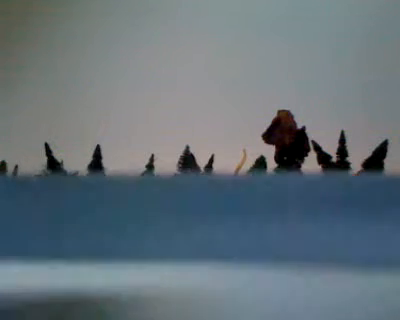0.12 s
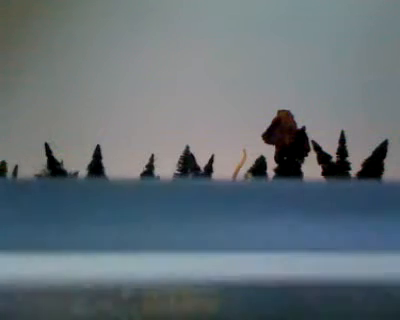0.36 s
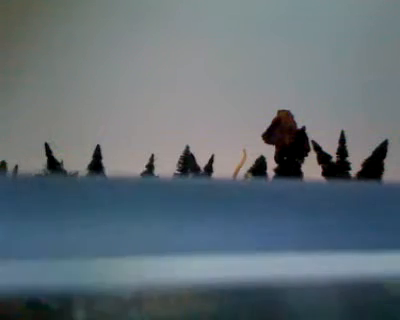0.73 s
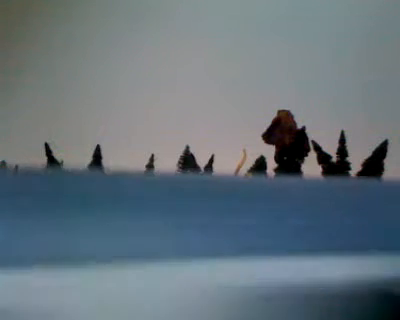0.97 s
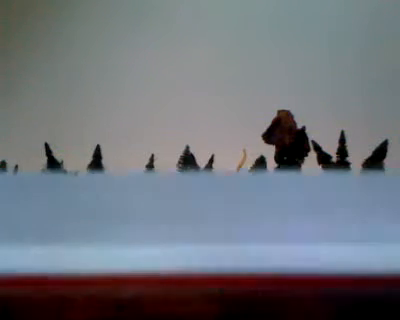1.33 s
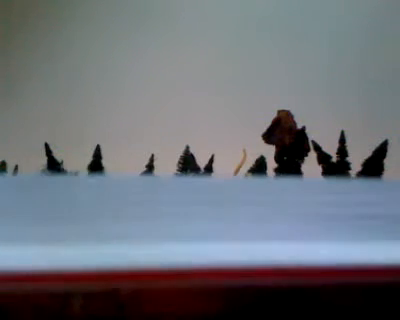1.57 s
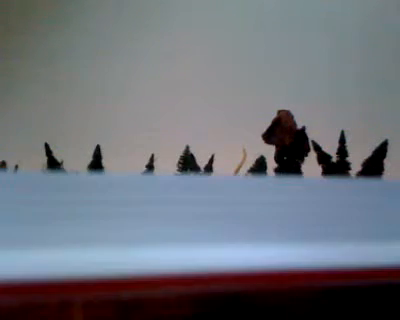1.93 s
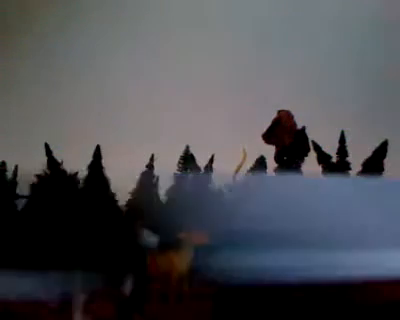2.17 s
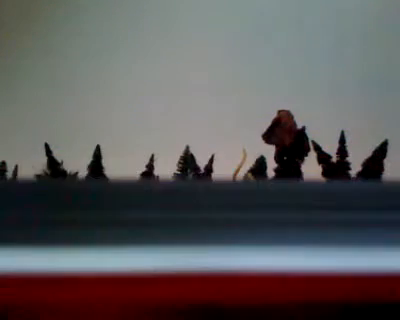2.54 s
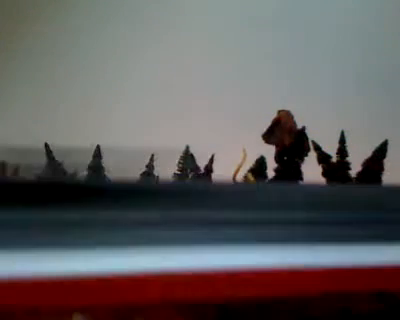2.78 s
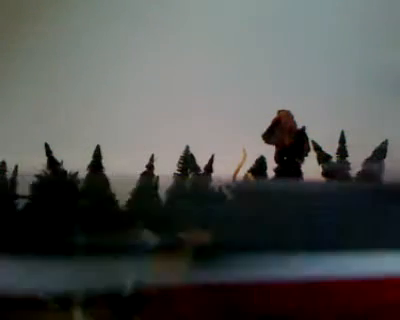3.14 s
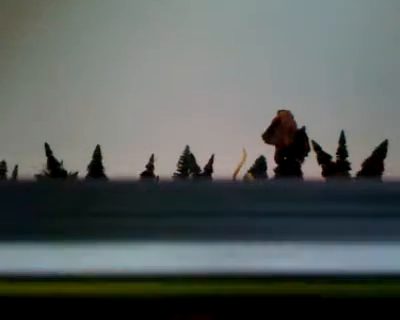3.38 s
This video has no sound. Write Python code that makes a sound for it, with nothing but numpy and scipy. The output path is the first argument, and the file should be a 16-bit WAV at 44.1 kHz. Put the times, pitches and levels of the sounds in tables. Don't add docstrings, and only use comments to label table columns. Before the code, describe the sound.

A model train rolls past on a table in a room, close to a camera microphone; steady wheel hiss with constant irregular clicks and plastic knocks, sharper double ticks at nearby rail gaps, low rumble underneath.

```python
import sys
import numpy as np
from scipy import signal
from scipy.fft import rfft, irfft
from scipy.io import wavfile
from scipy.ndimage import uniform_filter1d

SR = 44100
rng = np.random.default_rng(int(sys.argv[2]) if len(sys.argv) > 2 else 0)


def gain_from_decibels(decibels):
    exponent = np.asarray(decibels, float) / 20
    return 10 ** exponent


def int16_out(signal):
    q = np.round(np.clip(np.atleast_2d(signal).T, -1, 1) * 32767)
    wavfile.write(sys.argv[1], SR, q.astype(np.int16))


N = 158760

# frequency in Hz, level in dB.
FAR_COLOUR = [(2000, -9), (4500, 2.5), (7000, 3), (10000, -4), (13000, -11), (16000, -18)]


def evened(x):
    return x / np.sqrt(np.mean(x ** 2) + 1e-20)


def read(points, hz):
    f, value = np.transpose(points)
    return np.interp(np.log(hz + 1), np.log(f + 1), value)


def coloured(points, size):
    gain = gain_from_decibels(read(points, np.fft.rfftfreq(size, 1 / SR)))
    return evened(irfft(rfft(rng.standard_normal(size)) * gain, size))


def tone(hz, size):
    return np.sin(2 * np.pi * hz * np.arange(size) / SR)


def resonate(x, hz, width):
    turn = np.exp(2j * np.pi * hz * np.arange(len(x)) / SR)
    r = np.exp(-np.pi * abs(width) / SR)
    return 2 * (turn * signal.lfilter([1 - r], [1, -r], x / turn)).real


def burst(x, length):
    u = np.arange(len(x)) / SR / abs(length)
    y = x * u ** .7 * np.exp(-2 * u ** 1.5)
    return y / abs(y).max()


def struck(x, rise, t60):
    t = np.arange(len(x)) / SR
    y = x * (1 - np.exp(-(t / rise) ** 2)) * gain_from_decibels(-60 * t / t60)
    return y / abs(y).max()


def add(mix, s, sound):
    part = mix[round(s * SR):][:len(sound)]
    part += sound[:len(part)]


def rolling():
    # time in seconds, hiss level in dB.
    roll = [(0.0, -40.5), (0.14, -39.5), (0.76, -38.5), (1.26, -39.5), (2.07, -39.5), (3.49, -39),
            (3.6, -38.5)]
    # frequency in Hz, level in dB per Hz.
    roll_colour = [(200, -9), (440, -8.5), (800, 1), (2400, 0.5), (3400, -2.5), (4400, -7), (8000, -17.5),
                   (15800, -33)]
    # time in seconds, resonance in Hz, lift in dB.
    cars = [(.08, 2700, 1), (.3, 3400, 4), (.48, 3600, 3), (.56, 2900, 6), (.7, 3300, 7.5), (.84, 3350, 7),
            (.92, 2700, 6), (1.28, 2450, 1), (1.42, 3200, 5), (1.56, 3480, 6.5), (1.82, 3100, 7),
            (2.1, 2600, 6), (2.4, 2000, 3), (2.54, 3400, 5), (2.85, 3550, 5.5), (3.05, 3200, 5),
            (3.3, 2200, 3), (3.46, 3420, 5)]
    frames = N // 64 + 5
    hz = np.fft.rfftfreq(256, 1 / SR)[:, None]
    t = np.arange(frames) * 64 / SR
    real, imaginary, patches = rng.standard_normal((frames, 129, 3)).T
    patches = uniform_filter1d(patches, size=4, axis=0)
    patches = evened(uniform_filter1d(patches, size=40, axis=1))
    flicker = evened(uniform_filter1d(rng.standard_normal(frames), size=4))

    at, car_hz, lift_db = np.transpose(cars)
    centre = np.interp(t, at, car_hz)
    octaves = np.where(hz > centre, .11, .34)
    ridge = np.exp(-.5 * (np.log2((hz + 1) / centre) / octaves) ** 2)
    body_db = np.interp(t, at, lift_db) * ridge * (.85 + .3 * patches)
    flicker_db = (.75 + 1.1 * np.clip(hz / 8000, 0, 1)) * flicker
    grains = (real + 1j * imaginary) * gain_from_decibels(body_db + .7 * patches + flicker_db)
    hiss = signal.istft(grains, nperseg=256, noverlap=192)[1][:N]

    colour_db = read([(120, -100)] + roll_colour, np.fft.rfftfreq(N, 1 / SR))
    hiss = irfft(rfft(hiss) * gain_from_decibels(colour_db), N)
    s, level_db = np.transpose(roll)
    return evened(hiss) * gain_from_decibels(1 + np.interp(np.arange(N) / SR, s, level_db))


def tick(ring_hz, lead_s):
    # frequency in Hz, level in dB.
    tick_colour = [(700, -42), (2000, -20), (4500, 5), (7000, 7), (9000, 5), (13000, -6), (16000, -13)]
    contact_s = .0025
    out = np.zeros(1500)
    ring = gain_from_decibels(-10) * burst(tone(ring_hz, 600), .0024)
    strike = burst(coloured(tick_colour, 600), contact_s) + ring
    brush = burst(coloured(FAR_COLOUR, 600), contact_s)
    bounce = burst(coloured(tick_colour, 600), contact_s)
    add(out, 0, gain_from_decibels(-17) * brush)
    add(out, lead_s, strike / abs(strike).max())
    add(out, lead_s + .003, gain_from_decibels(-14) * bounce)
    return gain_from_decibels(.8) * out


def rattle():
    out = np.zeros(1500)
    for k, (late, size) in enumerate(rng.random((3, 2))):
        level = .6 * size if k else 1
        add(out, late * .005 * (k > 0), level * burst(coloured(FAR_COLOUR, 600), .0016))
    return out / abs(out).max()


def knock(hz):
    # frequency in Hz, level in dB.
    clack_colour = [(500, -19), (1000, -2), (2500, -4.5), (4000, -6), (7000, -12)]
    middle_hz = 2200
    fuzz = evened(resonate(rng.standard_normal(900), hz, 600 * hz / middle_hz))
    note = gain_from_decibels(-1.5) * tone(hz, 900) + fuzz
    clack = burst(coloured(clack_colour, 900), .003)
    body = burst(note, .0048 * np.sqrt(middle_hz / hz)) + clack
    lowpass = signal.butter(2, 6000, fs=SR)
    return gain_from_decibels(-1.5) * signal.lfilter(*lowpass, body / abs(body).max())


def joints():
    # start in seconds, tick in dB, rail ring in Hz,
    # body knock in dB above the tick, body note in Hz.
    near = [(0.19, -33, 4930, 8.5, 1900), (0.4822, -31, 5500, 10.5, 2620), (0.8135, -27, 7100, 6.5, 2700),
            (0.919, -34.5, 4880, 11.5, 2850), (1.421, -22, 5440, 3, 2840), (1.5109, -22, 7300, 0, 1420),
            (2.4448, -21.5, 5620, 1.5, 1440), (2.533, -26.5, 7370, 5.5, 1180), (3.456, -23, 5620, 5, 3370),
            (3.5474, -24, 7300, 3, 2780)]
    # start in seconds, knock in dB, body note in Hz, tick in dB relative to the
    far = [(0.046, -35, 2250, -21), (0.067, -27.5, 2600, -9), (0.178, -26.5, 2100, -12),
           (0.203, -22, 1950, -23), (0.235, -32, 2510, -18), (0.279, -30.5, 2180, -2),
           (0.304, -26.5, 1200, -7), (0.338, -33, 3340, -24), (0.369, -25, 2200, -6),
           (0.403, -34, 1700, 0), (0.543, -32.5, 1750, 2), (0.626, -28, 2750, -21),
           (0.65, -24.5, 2760, -15), (0.72, -25, 2750, -4), (0.895, -31, 2670, -14),
           (0.999, -21.5, 1710, -10), (1.039, -32, 980, -23), (1.063, -24.5, 2460, -10),
           (1.152, -23.5, 2660, -11), (1.223, -22, 2410, -11), (1.327, -23.5, 1590, -16),
           (1.352, -21.5, 2590, -15), (1.394, -33, 2280, -14), (1.459, -23.5, 2500, -9),
           (1.696, -24, 2830, -5), (1.756, -28, 2180, -5), (1.793, -20.5, 2900, -12),
           (1.849, -21, 3030, -6.5),
           (1.911, -35, 2870, -4), (1.992, -29, 2030, -22), (2.037, -22, 2110, -10),
                (2.076, -25, 1780, -26), (2.096, -45, 2290, -14), (2.14, -28, 1580, -30),
                (2.163, -29, 2720, -18), (2.189, -26, 2530, -19), (2.263, -31, 1520, -16),
                (2.309, -27, 1830, -5), (2.372, -20, 2090, -29), (2.394, -26.5, 1305, -6),
                (2.4658, -20, 1900, -16), (2.488, -29, 1470, 0), (2.601, -27, 1860, -11),
                (2.729, -28.5, 3360, -6), (2.765, -21.5, 2600, -11), (2.824, -20.5, 2710, -13),
                (2.857, -27, 3350, -5), (2.888, -42, 2300, -23), (3.077, -23.5, 2400, -11),
                (3.174, -22.5, 1950, -32), (3.299, -24, 2380, -26), (3.418, -21.5, 2040, -8.5),
                (3.509, -20.5, 1980, -18), (3.516, -25, 2950, -4), (3.537, -25, 2700, -11)]
    lead_s = .005
    out = np.zeros(N)
    for s, db, ring_hz, knock_db, hz in near:
        add(out, s - lead_s, gain_from_decibels(db) * tick(ring_hz, lead_s))
        add(out, s, gain_from_decibels(db + knock_db) * knock(hz))
    for s, db, hz, tick_db in far:
        add(out, s, gain_from_decibels(db + tick_db) * rattle())
        add(out, s, gain_from_decibels(db) * knock(hz))
    return out


def pins():
    # start in seconds, peak in dB, centre in Hz.
    loose_parts = [(0.0463, -46, 10500), (0.1194, -54, 11200), (0.1785, -39, 10600), (0.19, -33, 10500),
                   (0.2044, -43, 10800), (0.2349, -46, 11100), (0.2793, -50, 10600), (0.2882, -45, 10600),
                   (0.3042, -45, 11000), (0.3784, -49, 11200), (0.389, -45, 10700), (0.4144, -49, 12400),
                   (0.7193, -44, 12000), (0.7394, -52, 11400), (0.907, -39, 11100), (0.9193, -33, 10500),
                   (0.9687, -38, 11100), (0.9981, -45, 12300), (1.064, -49, 12000), (1.0765, -40, 12300),
                   (1.1248, -51, 10700), (1.2516, -44, 10700), (1.3269, -46, 11300), (1.4744, -53, 11000),
                   (1.5648, -45, 11500), (1.5994, -51, 10600), (1.6372, -50, 11600), (1.7044, -51, 11500),
                   (1.7564, -42, 12000), (1.8497, -43, 12400), (1.9939, -42, 11600), (2.0044, -54, 10700),
                   (2.0971, -44, 10800), (2.163, -42, 11600), (2.174, -38, 12200), (2.1944, -39, 14500),
                   (2.2657, -38, 13700), (2.3344, -49, 10600), (2.392, -45, 10700), (2.4834, -45, 11900),
                   (2.5112, -46, 10900), (2.602, -43, 10700), (2.7317, -49, 11500), (2.7744, -48, 11800),
                   (2.8644, -44, 10700), (3.0769, -38, 11700), (3.1617, -49, 11000), (3.1747, -47, 10700),
                   (3.1986, -48, 10500), (3.2705, -47, 11200), (3.2909, -51, 11700), (3.4244, -50, 11600),
                   (3.5244, -50, 11800), (3.5374, -41, 12300)]
    width_hz = 6000
    out = np.zeros(N)
    for s, db, hz in loose_parts:
        noise = resonate(resonate(rng.standard_normal(600), hz, width_hz), hz, width_hz)
        add(out, s, gain_from_decibels(db - 1) * burst(noise, .002))
    return out


def grit():
    per_second, spread_db, tilt_db = 300, 3.9, 5
    falls = rng.random(N) < per_second / SR
    size = gain_from_decibels(spread_db * np.minimum(rng.exponential(1, N), 4)) * falls
    kind = rng.integers(0, 16, N)
    out = np.zeros(N)
    for k, tilt in enumerate(np.linspace(-.5, 1, num=16)):
        colour = [(f, db + tilt_db * tilt * np.log2(f / 10000)) for f, db in FAR_COLOUR]
        grain = burst(coloured(colour, 600), .0015) * gain_from_decibels(-tilt_db * tilt)
        out += signal.oaconvolve(size * (kind == k), grain)[:N]
    return gain_from_decibels(-60) * evened(out)


def table():
    # frequency in Hz, level in dB per Hz.
    rumble_colour = [(12, -36), (20, -11), (54, 2), (75, -2), (102, 1), (140, 0.5), (184, -9.5), (239, -24)]
    # time in seconds, rumble lift in dB.
    load = [(0, 1.5), (.45, -0.5), (.9, 1), (1.35, -1.5), (1.8, 0), (2.3, 2.5), (2.8, 3), (3.2, 1),
            (3.6, -1.5)]
    # frequency in Hz, width in Hz, level in dB.
    hum = [(70, 33, -59.5), (139.4, 15, -61), (285.3, 5.2, -72), (404.6, 14, -66), (804, 76, -65.5),
           (8800, 80, -92)]
    # start in seconds, level in dB, frequency in Hz.
    bumps = [(0.199, -42, 70.0), (0.476, -40, 73.5), (0.818, -43, 69), (0.919, -53, 64), (1.029, -47, 70.0),
             (1.152, -54, 78.1), (1.332, -41, 85), (1.562, -41.5, 91.5), (1.669, -47, 147),
             (2.159, -44, 64.6), (2.297, -56, 139), (2.498, -44, 64.5), (2.8, -52, 50), (2.858, -39.5, 58),
             (3.049, -45, 92), (3.239, -43.5, 119), (3.453, -44, 70.0)]
    weight = gain_from_decibels(np.interp(np.arange(N) / SR, *np.transpose(load)))
    out = gain_from_decibels(-56.5) * coloured([(10, -40)] + rumble_colour + [(330, -48)], N) * weight
    for hz, width, db in hum:
        line = resonate(resonate(rng.standard_normal(N), hz, width), hz, width)
        out += gain_from_decibels(db) * evened(line)
    for s, db, hz in bumps:
        add(out, s, gain_from_decibels(db - 2) * struck(tone(hz, SR // 4), rise=.01, t60=.087))
    return out


def room(x):
    t60 = .14
    taps = np.zeros(8000)
    places = np.arange(60, 7980, 20) + rng.integers(0, 20, 396)
    taps[places] = rng.choice([-1., 1.], 396)
    taps *= gain_from_decibels(-60 * np.arange(8000) / SR / t60)
    return signal.oaconvolve(x, taps / np.linalg.norm(taps))[:N]


def scene():
    hits = joints() + grit() + pins()
    return (hits + gain_from_decibels(-16) * room(hits) + rolling() + table())[None]


def top_cut(x):
    return signal.sosfilt(signal.butter(12, 15900, fs=SR, output="sos"), x)


def record(dry):
    band_limit = signal.firwin(401, 15760, window=("kaiser", 8), fs=SR)
    mix = signal.oaconvolve(dry, band_limit[None], "same")
    return top_cut(mix)


dry = scene()
out = record(dry)
int16_out(out)
```